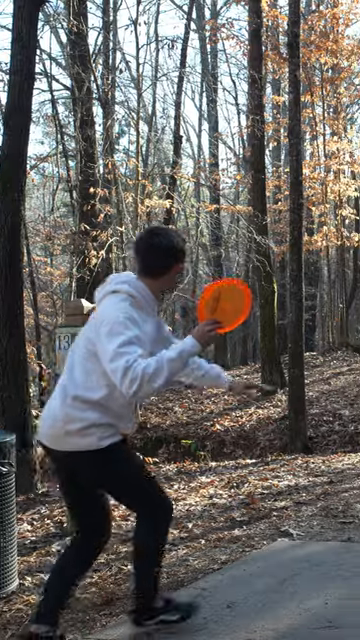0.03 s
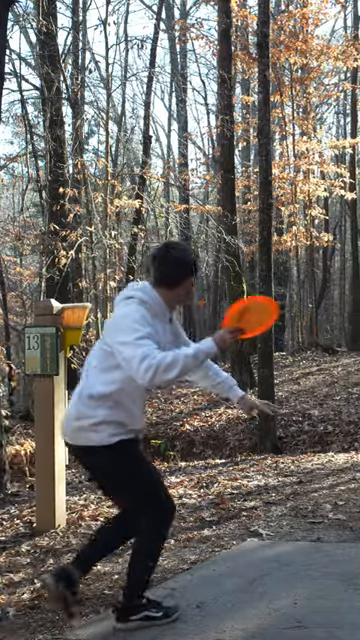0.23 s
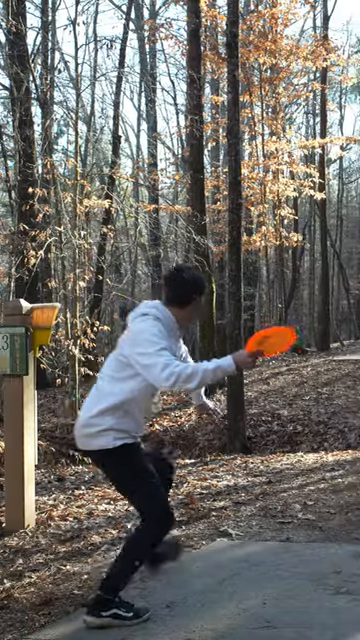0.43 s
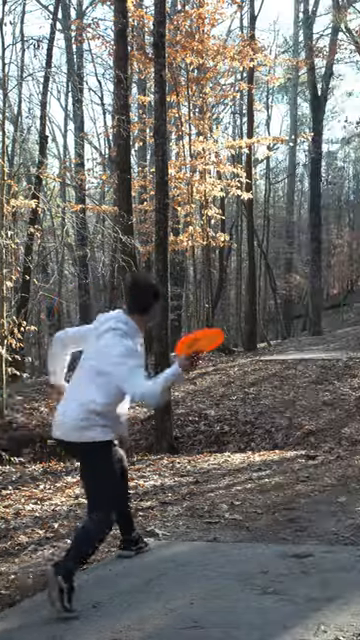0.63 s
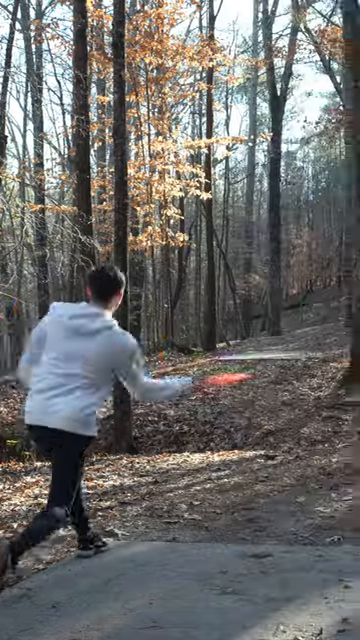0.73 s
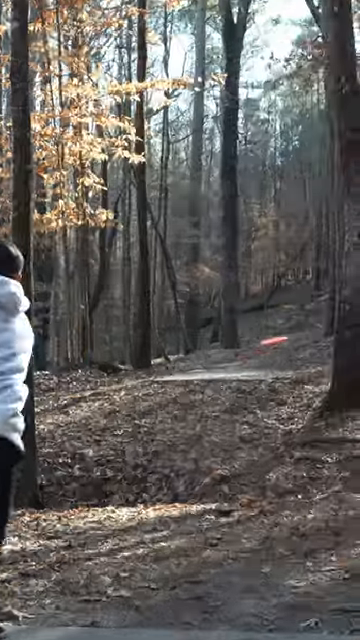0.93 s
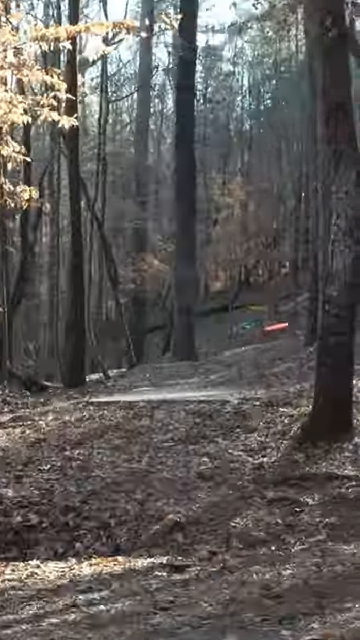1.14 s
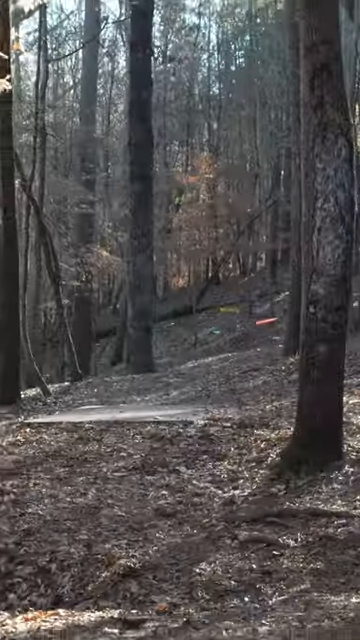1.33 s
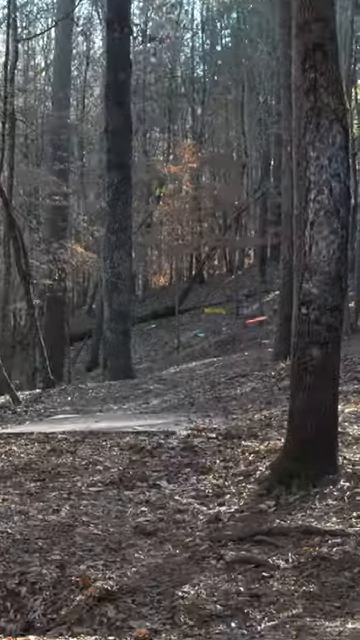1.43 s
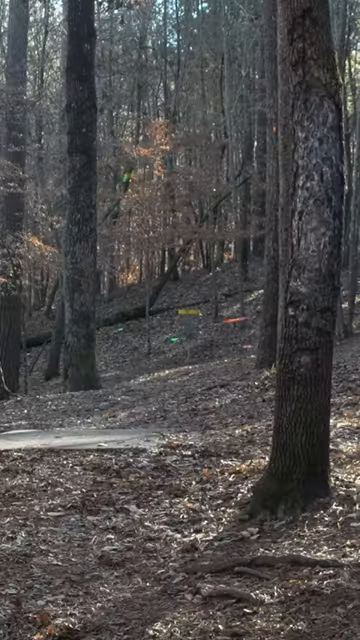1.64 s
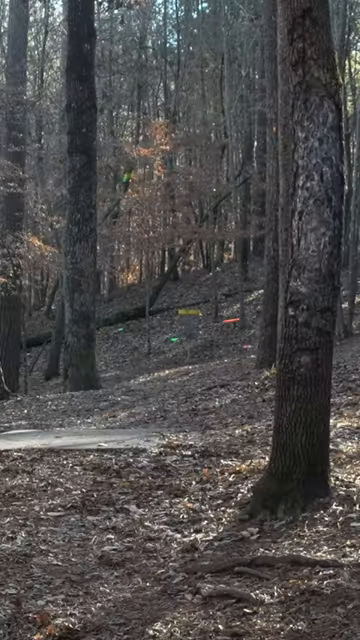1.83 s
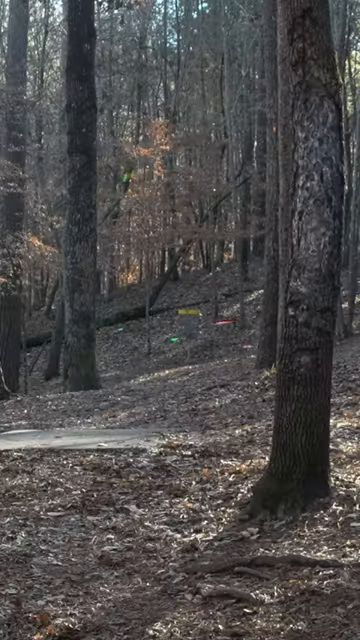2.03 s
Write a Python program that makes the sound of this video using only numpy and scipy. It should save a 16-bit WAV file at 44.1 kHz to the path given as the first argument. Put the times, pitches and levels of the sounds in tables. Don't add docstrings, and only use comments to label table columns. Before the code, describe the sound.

Scraping footsteps on a gritty concrete slab, hard landing and crisp disc release in bare woodland

```python
import sys
import numpy as np
from scipy import signal
from scipy.fft import rfft, irfft
from scipy.io import wavfile
from scipy.ndimage import uniform_filter1d

SR = 44100
rng = np.random.default_rng(int(sys.argv[2]) if len(sys.argv) > 2 else 0)


def elevation(decibels):
    levels = np.asarray(decibels, float)
    return 10 ** (levels / 20)


def bounce(signal):
    frames = np.transpose(np.atleast_2d(signal))
    limited = np.clip(frames, -1, 1)
    pcm = np.round(limited * 32767).astype(np.int16)
    wavfile.write(sys.argv[1], SR, pcm)


N = 92610

# (time [s], level [dB])
DRAG_LEVEL = [(0, -52), (.1, -62), (.17, -42), (.24, -35.5), (.35, -50.5), (.43, -38), (.49, -48),
              (.55, -32.5), (.6, -30), (.64, -24.5), (.73, -25), (.765, -25.5), (.84, -32.5), (.88, -37),
              (.94, -38.5), (.98, -43.5), (1.12, -58), (1.4, -72)]
# (centre [Hz], width [Hz], level [dB])
SLAB_RESONANCES = [(58.4, 79, -9.5), (99.2, 66, -2.5), (156, 68.4, -1), (260, 242, -3.5), (482, 310, -16)]
# (time [s], peak [dB], starting pitch [Hz], t60 [s], pitch sag [per cycle])
FOOT_THUDS = [(0.0942, -34, 2180, 0.0028, 0.24), (0.0954, -32, 800, 0.0091, 0.028),
              (.144, -54, 355, 0.023, 0.58), (0.379, -24, 124, 0.05, 0.17),
              (0.507, -27.5, 171, 0.046, 0.17), (0.531, -29, 260, 0.051, 0.15),
              (0.602, -25.5, 405, 0.012, 1.3), (0.612, -22.5, 95, 0.048, 0.29),
              (.644, -21.5, 600, 0.027, 0.44), (0.653, -17.5, 214, 0.051, 0.6),
              (0.717, -15, 1050, 0.0083, 0.012), (0.722, -30, 890, 0.012, .1),
              (0.7825, -16, 254, 0.018, 0.021), (0.786, -15.5, 1120, 0.0056, 1.1),
              (0.803, -20, 506, 0.011, 0.9), (.8085, -33, 690, 0.017, 0.25), (.928, -33, 520, 0.0072, 0.32),
              (0.994, -32, 300, 0.009, 0.46), (1.0196, -14, 476, 0.017, 1.4),
              (1.2156, -35, 330, 0.014, 0.36), (1.2193, -36, 620, 0.013, 0.33),
              (1.222, -33, 228, 0.038, 0.35), (1.231, -37.5, 124, 0.085, 0.046),
              (1.2501, -34, 305, 0.027, 0.2), (1.274, -42, 110, 0.044, 0.24)]
# (time [s], peak [dB], centre [Hz], length [ms])
TICKS_AND_SNAP = [(.185, -34.5, 8000, 0.31), (.457, -45, 13000, 0.45), (0.67, -46, 6100, .6),
                  (0.638, -31, 5150, 0.9), (0.655, -35, 4800, 0.8), (.6387, -31, 12000, .6),
                  (.6015, -41, 5500, .7), (0.6453, -33, 2800, 1.2), (0.6015, -40, 1900, 1),
                  (.6155, -42, 2600, 1), (.692, -33, 5200, 1.2), (.69, -34, 3000, 1.2),
                  (.7715, -31, 1900, 1), (.7915, -35, 3300, 1), (.804, -32, 1500, 1.2),
                  (.8085, -36, 2000, 1), (1.1915, -48, 2450, 2.5), (.666, -29, 5600, 0.85),
                  (.6865, -27, 8500, 0.6), (.7598, -25.5, 6000, .8), (.76, -34, 10000, .6),
                  (.76, -38, 2000, .8), (0.771, -28, 7900, 0.47), (.7866, -18, 7800, 1.0),
                  (.7865, -16, 1900, 1.0), (.7868, -20, 13500, 1.2), (.7173, -30, 3600, .7),
                  (1.266, -46, 15000, .5), (1.2165, -48, 900, 1.0), (.884, -36, 7100, 0.59),
                  (.935, -32.5, 2500, .8), (0.944, -35, 2500, 0.63), (1.02, -36, 6500, .8),
                  (1.02, -42, 13000, 1.2), (1.059, -39, 9000, .9), (1.043, -37.5, 2400, 1),
                  (1.255, -33.5, 7000, 0.56)]
# (time [s], length [s], level [dB], centre [Hz])
SOLE_SCRAPES = [(.103, 0.0089, -56, 6500), (0.179, 0.008, -49, 2560), (0.195, .006, -53, 4000),
                (0.221, 0.019, -56.5, 2850), (0.644, 0.0051, -46, 2270), (.648, 0.0085, -38, 1420),
                (0.655, 0.027, -47, 2040), (0.684, 0.024, -46, 3340), (0.687, 0.0044, -45, 7400),
                (0.755, 0.012, -42, 1680), (0.786, 0.011, -50, 2000), (0.666, 0.047, -49, 597),
                (0.382, 0.0055, -51, 980), (0.561, .01, -52, 890), (0.886, .015, -58, 790),
                (0.595, 0.018, -50.5, 930), (0.645, 0.014, -35.5, 740), (0.772, 0.017, -31.5, 770),
                (0.798, 0.0045, -48, 1080), (0.811, 0.072, -48.5, 574), (0.927, 0.031, -54, 2440),
                (1.051, 0.027, -45.5, 13200), (1.084, .014, -55, 12100), (1.051, 0.017, -51.5, 6940),
                (1.078, 0.02, -53.5, 7400), (1.213, 0.027, -58, 710), (1.51, 0.034, -48.5, 585),
                (1.515, 0.021, -54.5, 2160), (1.518, 0.028, -58, 4600), (1.6, .055, -64.5, 13500),
                (0.791, 0.011, -40, 1200), (2.048, .005, -64, 13000), (2.072, .005, -62, 13500)]
# (time [s], level [dB])
GRIND_LEVEL = [(0, -60.5), (.2, -58), (.33, -71), (.58, -66), (.635, -55), (.7, -52.5), (.745, -53),
               (.79, -45.5), (.86, -53.5), (.95, -59), (1.03, -61.5), (1.12, -63.5)]
# (frequency [Hz], density [dB per Hz])
GRIT_TONE = [(800, 12.5), (2000, 2.5), (4000, 0.5), (6500, 4), (9500, -1.5), (13000, -0.5), (15800, -4.5)]
# (time [s], rise [s], hold [s], level [dB], extra treble [dB per octave])
LEG_BRUSHES = [
    (1.244, 0.1, 0.14, -57.5, 0),
    (1.64, 0.16, .35, -58, 1.5),
]
# (frequency [Hz], density [dB per Hz])
CLOTH_TONE = [(2500, -10), (3500, -7.5), (4300, 3.5), (5200, -1.5), (6500, -5.5), (9500, -15.5),
              (12000, -13.5), (15800, -17)]
# (frequency [Hz], density [dB per Hz])
WOODS_TONE = [(25, -23), (70, -3), (170, -2.5), (500, -8.5), (1200, -18), (2800, -26.5), (6000, -26.5),
              (15800, -30)]

SLIPS_PER_S, SLIP_JITTER, SLIP_SCATTER_DB, SLIP_PUSH_S = 150, 0.6, 2.0, 0.0035
RUMBLE_DB = 8
BRIGHTEN = 0.6
THUD_RISE_CYCLES = 0.287
SCRAPE_ATTACK_S, SCRAPE_RELEASE_S, SCRAPE_FADE_DB = 0.0019, 0.0052, -2.5
SCRAPE_GRAINS_PER_S, SCRAPE_SCATTER_DB, SCRAPE_WIDEST_HZ = 9000, 2.0, 6030
GRIT_GRAINS_PER_S, GRIT_SCATTER_DB = 6800, 2.5
BRUSH_RELEASE_S, BRUSH_FLICKER_DB = 0.029, 0.4
TRUNKS_DB, TRUNKS_T60_S, TRUNKS_TOP_HZ = -24, 0.037, 5000
WOODS_DB, FLICKER_DB = -51, 1.2
LULL_S, LULL_LASTS_S, LULL_DB, LEAVES_HZ = 1.7, 0.44, -3.5, 1200


def band(x, hz, width):
    hz = min(hz, 0.45 * SR)
    return signal.lfilter(*signal.iirpeak(hz, hz / width, fs=SR), x)


def double_band(x, hz, width):
    return band(band(x, hz, width), hz, width)


def unit(x):
    return x / np.sqrt(np.mean(x ** 2))


def decay(t, t60):
    return np.exp(-np.log(1000) * t / t60)


def curve(rows):
    times, levels = np.array(rows).T[:2]
    return np.interp(np.arange(N) / SR, times, levels, right=-120)


def colour(x, points):
    hz, db = np.array(points).T
    f = np.maximum(np.fft.rfftfreq(len(x), 1 / SR), 1)
    gain = elevation(np.interp(np.log(f), np.log(hz), db))
    return unit(irfft(rfft(x) * gain, len(x)))


def grains(size, rate, scatter_db):
    chance, side, strength = rng.random((size, 3)).T
    clicks = (chance < rate / SR) * np.sign(side - 0.5)
    return unit(clicks * elevation(-scatter_db * np.log(strength + 1e-4)))


def walk(rate):
    hold = int(SR / rate)
    steps = np.repeat(rng.standard_normal(N // hold + 1), hold)
    return 2.48 * uniform_filter1d(uniform_filter1d(steps, hold), hold)[:N]


def add(out, at, x):
    i = int(at * SR)
    out[i:i + len(x)] += x[:len(out) - i]


def drag():
    pace, strength = rng.standard_normal((600, 2)).T
    at = (np.cumsum(np.exp(SLIP_JITTER * pace)) / SLIPS_PER_S * SR).astype(int)
    slips = np.zeros(N)
    slips[at[at < N]] = elevation(SLIP_SCATTER_DB * strength[at < N])
    push = np.hanning(int(SLIP_PUSH_S * SR))
    pushes = np.convolve(slips, push, "same") - slips.mean() * push.sum()
    force = unit(pushes) * 3 + elevation(RUMBLE_DB) * rng.standard_normal(N)
    level = curve(DRAG_LEVEL)
    out = np.zeros(N)
    for hz, width, db in SLAB_RESONANCES:
        tilt_db = BRIGHTEN * (level + 28.0) * np.log2(hz / 100)
        out += unit(double_band(force, hz, 1.29 * width)) * elevation(db + tilt_db)
    return out * elevation(level - 1.0)


def thuds():
    out, t = np.zeros(N), np.arange(SR // 10) / SR
    for at, db, hz, t60, sag in FOOT_THUDS:
        sag = max(sag, 0.01)
        turns = np.log1p(sag * hz * t) / sag
        rise = 1 - np.exp(-(hz * t / THUD_RISE_CYCLES) ** 2)
        ring = np.sin(2 * np.pi * turns) * decay(t, t60) * rise
        add(out, at, ring / np.abs(ring).max() * elevation(db))
    return out


def ticks():
    out, t = np.zeros(N), np.arange(SR // 100) / SR
    for at, db, hz, ms in TICKS_AND_SNAP:
        crumble = rng.standard_normal(len(t)) * np.exp(-2.5 * t * 1000 / ms)
        crack = (t == 0) + 0.39 * crumble
        crack = double_band(crack, hz, min(0.7 * hz, 3600))
        add(out, at, crack / np.abs(crack).max() * elevation(db))
    return out


def scrapes():
    out, t = np.zeros(N), np.arange(SR // 10) / SR
    for at, length, db, hz in SOLE_SCRAPES:
        attack = np.clip(t / SCRAPE_ATTACK_S, 0, 1)
        release = np.exp(-np.maximum(t - length, 0) / SCRAPE_RELEASE_S)
        grit = grains(len(t), SCRAPE_GRAINS_PER_S, SCRAPE_SCATTER_DB)
        rasp = unit(double_band(grit, hz, min(1.2 * hz, SCRAPE_WIDEST_HZ)))
        add(out, at, rasp * attack * release * elevation(db + SCRAPE_FADE_DB * t / length))
    return out


def grind():
    grit = grains(N, GRIT_GRAINS_PER_S, GRIT_SCATTER_DB)
    return colour(grit, [(300, 9)] + list(GRIT_TONE)) * elevation(curve(GRIND_LEVEL) + 6.5)


def brushes():
    t, out = np.arange(N) / SR, np.zeros(N)
    for at, rise, hold, db, treble_db in LEG_BRUSHES:
        weave = [(hz, g + treble_db * np.log2(hz / 4300)) for hz, g in CLOTH_TONE]
        swell = np.clip((t - at) / rise, 0, 1)
        release = np.exp(-np.maximum(t - at - rise - hold, 0) / BRUSH_RELEASE_S)
        hiss = colour(grains(N, 12000, 0.78), [(800, -50)] + weave)
        out += hiss * swell * release * elevation(db)
    return out * elevation(BRUSH_FLICKER_DB * walk(32.23))


def trunks(near):
    t = np.arange(SR // 2) / SR
    scatter = band(rng.standard_normal(len(t)), TRUNKS_TOP_HZ / 2, TRUNKS_TOP_HZ)
    tail = scatter * decay(t, TRUNKS_T60_S) * (t > 0.004)
    return elevation(TRUNKS_DB) * signal.fftconvolve(near, tail / np.sqrt(np.sum(tail ** 2)))[:N]


def woods():
    air, t = np.zeros(N), np.arange(N) / SR
    for k in range(9):
        hz = 40 * 2.0 ** k
        octave = unit(band(rng.standard_normal(N), hz, hz))
        air += octave * 2 ** (k / 2) * elevation(FLICKER_DB * walk(9))
    air = colour(air, WOODS_TONE)
    leaves = signal.sosfilt(signal.butter(1, LEAVES_HZ, "high", fs=SR, output="sos"), air)
    lull = (t > LULL_S) * np.exp(-(np.maximum(t - LULL_S, 0) / LULL_LASTS_S) ** 2)
    return (air - leaves * (1 - elevation(LULL_DB * lull))) * elevation(WOODS_DB)


def scene():
    near = drag() + thuds() + ticks() + scrapes() + grind() + brushes()
    return (near + trunks(near) + woods())[None]


def top_cut(x):
    return signal.sosfilt(signal.butter(12, 15830, fs=SR, output="sos"), x)


def record(dry):
    x = signal.sosfilt(signal.butter(2, 35, "high", fs=SR, output="sos"), dry)
    x = signal.sosfilt(signal.ellip(10, 0.2, 70, 15800, fs=SR, output="sos"), x)
    return top_cut(x)


dry = scene()
out = record(dry)
bounce(out)
```